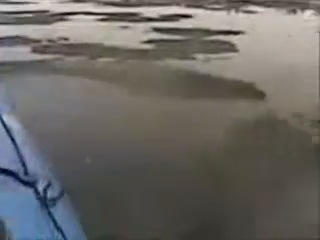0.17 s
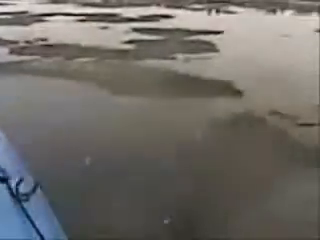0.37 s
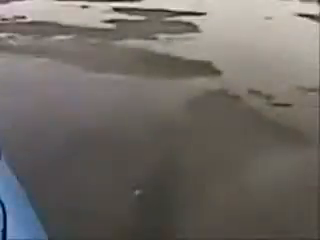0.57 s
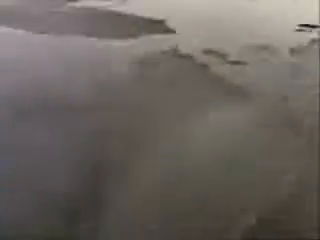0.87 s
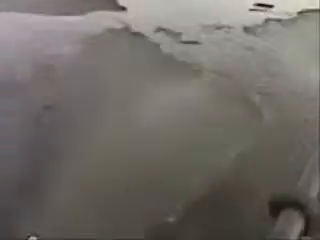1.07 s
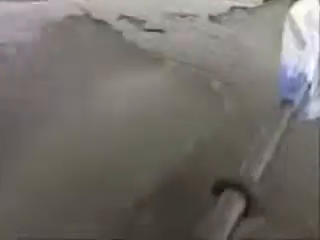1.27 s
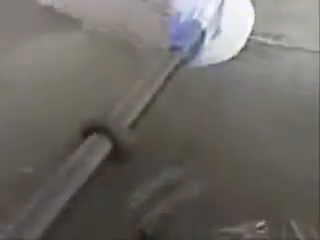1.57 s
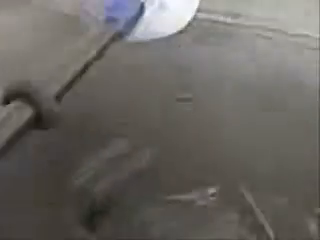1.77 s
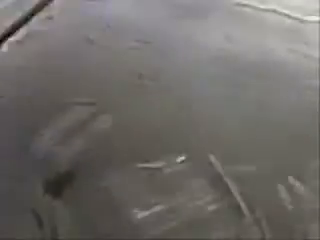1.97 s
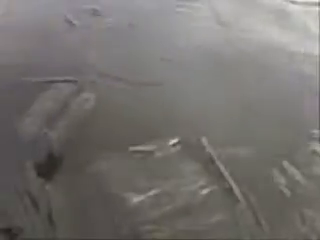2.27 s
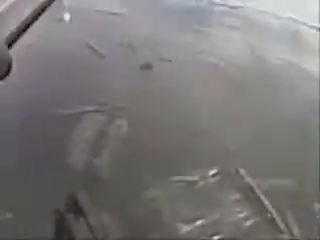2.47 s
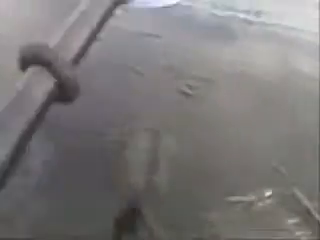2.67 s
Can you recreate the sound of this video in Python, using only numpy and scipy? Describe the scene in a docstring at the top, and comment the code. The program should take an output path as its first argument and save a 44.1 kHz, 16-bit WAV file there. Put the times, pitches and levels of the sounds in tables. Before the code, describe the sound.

Water stirred beside a gliding kayak washes and fizzes softly, then thins as paddle drips plop and trickle; a quick hollow knock mid-way, fainter ones later. Open calm lake, close dull microphone, steady hiss.

```python
"""On a calm, partly frozen lake, a kayak glides past its last stroke. A small dull microphone at the seat hears
a wash of noise and fine bubbles over a low slosh, with a steady faint hiss under it. Water off the raised
paddle trickles and lands as ticks, noise splashes and ringing bubbles; larger bubbles gurgle close beside the
hull, and a hollow note swells in the wash. The paddle knocks the hollow plastic hull: bursts of contact noise
over decaying modes."""
import sys
import numpy as np
from scipy import signal
from scipy.fft import rfft, irfft, next_fast_len
from scipy.io import wavfile
from scipy.ndimage import uniform_filter1d, map_coordinates

SR = 44100
rng = np.random.default_rng(int(sys.argv[2]) if len(sys.argv) > 2 else 0)


def bounce(signal):
    """Save signal as a 16-bit WAV file at the path given by the first command-line argument."""
    frames = np.transpose(np.atleast_2d(signal))
    limited = np.clip(frames, -1, 1)
    pcm = np.round(limited * 32767).astype(np.int16)
    wavfile.write(sys.argv[1], SR, pcm)


N = 124362  # samples, about 2.82 s


def amp(db):
    """Decibels to gain."""
    return 10 ** (np.asarray(db) / 20)


def unit(x):
    """Scale x to rms 1."""
    return x / np.sqrt(np.mean(x ** 2) + 1e-20)


def fade(t, t60):
    """Exponential decay, down 60 dB after t60 seconds."""
    return amp(-60 * t / t60)


def onset(t, attack_s):
    """Exponential rise from silence with time constant attack_s."""
    return 1 - np.exp(-t / attack_s)


def along(points, hz):
    """Interpolate (frequency [Hz], value) points on a log frequency axis."""
    f, v = np.transpose(points)
    return np.interp(np.log(hz + 1), np.log(f + 1), v)


def curve(rows):
    """Interpolate (time [s], value) points to one value per sample."""
    return np.interp(np.arange(N) / SR, *np.transpose(rows))


def wobble(rate):
    """A smooth random curve through rate knots a second."""
    knots = rng.standard_normal(1024)
    return map_coordinates(knots, [np.arange(N) * rate / SR], mode="wrap")


def coloured(x, colour):
    """Filter x by a function from Hz to dB."""
    m = next_fast_len(len(x) + 4096)
    gain = amp(colour(np.fft.rfftfreq(m, 1 / SR)))
    return irfft(rfft(x, m) * gain, m)[:len(x)]


def noise(points):
    """Noise of rms 1 with the given spectrum."""
    return unit(coloured(rng.standard_normal(N), lambda hz: along(points, hz)))


def add(out, s, x):
    """Mix x into out at time s, cut off at the end of out."""
    part = out[max(0, round(s * SR)):][:len(x)]
    part += x[:len(part)]


def event_time():
    """Time axis of one short event, 0.2 s long."""
    return np.arange(SR // 5) / SR


SPATTER_DB, SPATTER_PER_S = 3.5, 684  # uneven specks of spray: depth [dB], knots per second


def burst(colour, attack_s, t60):
    """A speckled puff of coloured noise that dies away, with the energy of its envelope."""
    t = event_time()
    envelope = fade(t, t60) * onset(t, attack_s)
    specks = rng.standard_normal(len(t)) * amp(SPATTER_DB * wobble(SPATTER_PER_S)[:len(t)])
    puff = unit(coloured(specks, colour)) * envelope
    return puff * np.linalg.norm(envelope) / np.linalg.norm(puff)


def bubble(t, hz, cycles, rise, attack_s):
    """A trapped air bubble rings and rises in pitch by the share rise as it fades by 60 dB."""
    life = cycles / hz
    turns = hz * (t + rise * t * t / (2 * life))
    return np.sin(2 * np.pi * turns) * fade(t, life) * onset(t, attack_s)


BUBBLE_RISE = 0.1  # share by which pitch rises over the life of a small bubble

# Steady hiss in the background, spectrum: (frequency [Hz], level [dB])
FLOOR_COLOUR = [(100, -12), (1200, 4), (3400, 3.5), (4500, -2)]
FLOOR_DB = -54


def floor():
    """Steady coloured hiss in the background."""
    return amp(FLOOR_DB) * noise(FLOOR_COLOUR)


# Stirred water at the seat, spectrum of rush, fizz and trickle: (frequency [Hz], level [dB])
WASH_COLOUR = [(150, -37), (400, -11), (700, -5), (1000, -6.5), (1300, -2), (1650, -1.5), (2100, 0),
               (2700, -1), (3300, -12), (4500, -21.5)]
GRAIN_ATTACK_S = 0.00042


def swarm(per_s, spread_db, cycles):
    """Tiny bubbles of random time, pitch and size overlap into a texture of rms 1."""
    count = int(per_s * N / SR)
    start, pitch, chance = rng.random((3, count, 1))
    t = np.arange(SR // 20) / SR
    low_hz, high_hz = 800, 3300
    hz = low_hz + (high_hz - low_hz) * pitch
    size = amp(-spread_db * np.log(0.051 + chance))  # a few are much larger
    grains = size * bubble(t, hz, cycles, BUBBLE_RISE, GRAIN_ATTACK_S) * np.sqrt(hz)
    where = (start * N).astype(int) + np.arange(len(t))
    mixed = np.bincount(where.ravel(), grains.ravel(), N)[:N]
    return unit(coloured(mixed, lambda f: along(WASH_COLOUR, f)))


PATCHY_DB = 3.5  # rms depth of the patches


def patchy(x):
    """The rush swells and thins in random patches about 500 Hz wide and 30 ms long, at rms 1."""
    z = signal.stft(x, nperseg=512)[2]
    field = uniform_filter1d(rng.standard_normal(z.shape), size=6, axis=0)  # over pitch
    field = uniform_filter1d(field, size=5, axis=1)  # over time
    return unit(signal.istft(z * amp(PATCHY_DB * unit(field)), nperseg=512)[1][:N])


# Wash of the last stroke, close to the seat: (time [s], level [dB])
WASH_LEVEL = [(0, -45.5), (.28, -42.5), (.39, -47), (.55, -46), (.75, -44.5), (1.1, -48), (1.6, -50.5),
              (2.03, -50.5), (2.5, -54), (2.82, -54)]
# Low slosh along the hull: (time [s], level [dB])
SLOSH_LEVEL = [(0, -51.5), (.3, -55), (.6, -56.5), (.85, -55.5), (1.05, -53), (1.3, -56), (1.65, -57),
               (1.88, -54.5), (2.1, -60), (2.45, -58), (2.62, -53.5), (2.82, -49.5)]
# Spectrum of that slosh: (frequency [Hz], level [dB])
SLOSH_COLOUR = [(25, -44), (45, -18), (80, -8), (165, -9.5), (230, -2.5), (330, 0), (800, -1), (1150, 2.5),
                (1800, -22), (4000, -32)]
FIZZ_PER_S, FIZZ_SPREAD_DB, FIZZ_CYCLES = 800, 1, 29
FIZZ_DB, RUSH_DB = -4, -5.5  # relative to the wash level


def wash():
    """Stirred water: fine bubbles on a soft rush, over a low uneven slosh."""
    fizz = amp(FIZZ_DB) * swarm(FIZZ_PER_S, FIZZ_SPREAD_DB, FIZZ_CYCLES)
    rush_level = RUSH_DB + 0.74 * wobble(70) + 1.13 * wobble(24)
    rush = amp(rush_level) * patchy(noise(WASH_COLOUR))
    slosh = amp(curve(SLOSH_LEVEL) + 2.5 * wobble(34.91)) * noise(SLOSH_COLOUR)
    return amp(curve(WASH_LEVEL)) * (fizz + rush) + slosh


# Small drops off the raised paddle: (time [s], level [dB])
TRICKLE_LEVEL = [(0, -65), (1.3, -57), (1.7, -53.5), (2.1, -55.5), (2.5, -56.5)]
TRICKLE_PER_S, TRICKLE_SPREAD_DB, TRICKLE_CYCLES = 170, 2.5, 17


def trickle():
    """Small separate drops each ring a tiny bubble, sparser and shorter than the fizz."""
    return amp(curve(TRICKLE_LEVEL)) * swarm(TRICKLE_PER_S, TRICKLE_SPREAD_DB, TRICKLE_CYCLES)


# Water landing on the lake near the seat: (time [s], bubble pitch [Hz], bubble level [dB],
# bubble life [cycles], splash level [dB], splash t60 [s])
PLOPS = [(.009, 2430, -30, 54, -36.5, 0.035), (0.233, 1040, -36.5, 25, -41, .06),
         (.329, 926, -33, 30, -29.5, 0.054), (.349, 2880, -32.5, 105, -42, 0.036),
         (0.353, 940, -34, 38, -41, 0.052), (0.603, 2570, -32.5, 65, -39.5, 0.12),
         (.831, 2720, -34.5, 89, -51, 0.033), (1.127, 1486, -34.5, 63, -41, 0.069),
         (1.202, 1403, -42, 72, -36.5, 0.12), (1.313, 2120, -31, 91, -35.5, 0.025),
         (1.321, 1900, -28, 36, -42, 0.15), (1.402, 1955, -23, 37, -36.5, 0.049),
         (1.457, 2113, -34, 77, -36, 0.038), (1.463, 2190, -24.5, 46, -37, 0.023),
         (1.686, 910, -34, 21, -43, 0.035), (1.688, 1680, -25, 45, -34, 0.018),
         (1.835, 2660, -36.5, 250, -32, 0.044), (1.865, 2170, -36, 41, -40, 0.041),
         (1.88, 1177, -28.5, 35, -37, 0.057), (1.893, 1215, -31, 26, -36.5, 0.028),
         (1.912, 2200, -36, 88, -50, 0.033), (1.931, 2620, -39.5, 64, -40, 0.027),
         (1.951, 1710, -30, 49, -42, 0.014), (1.978, 1141, -30.5, 29, -37, 0.057),
         (1.995, 2360, -38, 31, -36.5, 0.034), (2.067, 1844, -27.5, 48, -33.5, 0.023),
         (2.087, 1920, -39, 40, -38, 0.038), (2.115, 1734, -36, 72, -46.5, 0.035),
         (2.137, 2270, -34.5, 47, -39, 0.033), (2.201, 1085, -39, 60, -40.5, 0.044),
         (2.24, 2600, -37.5, 83, -42, 0.031), (2.257, 1322, -38.5, 87, -49, 0.069),
         (2.378, 1290, -39, 44, -41, 0.036), (2.555, 1170, -39, 62, -40.5, 0.11),
         (2.649, 1700, -34, 33, -40, 0.044), (2.662, 1260, -29.5, 56, -31.5, 0.053),
         (2.666, 2460, -33.5, 98, -42, 0.038), (2.685, 1060, -22, 17, -39, 0.049),
         (2.726, 1151, -31, 56, -39, 0.11), (2.762, 1210, -26, 11, -44.5, 0.11)]
# Splash spectrum before the focus on its bubble: (frequency [Hz], level [dB])
SPLASH_COLOUR = [(100, -17), (350, -14.5), (650, 0), (1000, 4), (1400, 3), (2000, 1.5), (2700, -3),
                 (3500, -7), (4600, -14)]
BUBBLE_ATTACK_S, SPLASH_ATTACK_S = 0.0019, 0.0016
SPLASH_FOCUS_DB, SPLASH_WIDTH_OCT = 5.5, 0.46  # extra strength near the bubble's pitch
TICK_DB, TICK_T60_S = 3.5, 0.0071  # first contact of the water, relative to its splash
CONTACT_ATTACK_S = 0.0005  # shared by ticks and hull clacks


def plops():
    """Each fall of water ticks on the surface, makes a short splash and traps a bubble."""
    out, t = np.zeros(N), event_time()
    for s, hz, bubble_db, cycles, splash_db, t60 in PLOPS:
        def colour(f):
            octaves = np.log2((f + 1) / hz)
            focus = np.exp(-.5 * (octaves / SPLASH_WIDTH_OCT) ** 2)
            return along(SPLASH_COLOUR, f) + SPLASH_FOCUS_DB * focus

        tick = amp(TICK_DB) * burst(colour, CONTACT_ATTACK_S, TICK_T60_S)
        splash = burst(colour, SPLASH_ATTACK_S, t60)
        add(out, s, amp(splash_db) * (tick + splash))
        add(out, s, amp(bubble_db) * bubble(t, hz, cycles, BUBBLE_RISE, BUBBLE_ATTACK_S))
    return out


# Big slow bubbles close beside the hull: (time [s], pitch [Hz], level [dB])
GURGLES = [(.442, 386, -44.5), (0.468, 342, -40.5), (.931, 395, -42), (0.956, 269, -48), (.974, 306, -39.5),
           (.98, 223, -45.5), (1.02, 640, -42), (1.074, 530, -41), (1.099, 323, -40.5), (1.331, 405, -40),
           (1.494, 320, -37.5), (1.512, 249, -46.5), (2.691, 630, -40.5), (2.698, 350, -42),
           (2.767, 341, -39.5)]
# Water shoved aside by a large bubble, spectrum: (frequency [Hz], level [dB])
PUSH_COLOUR = [(25, -19), (130, -8.5), (280, 3), (500, -5), (1200, -16), (4000, -27)]
GURGLE_CYCLES, GURGLE_RISE, GURGLE_ATTACK_S = 20, 0.02, 0.0023
PUSH_DB, PUSH_T60_S = -9, 0.099  # level relative to the ring


def gurgles():
    """Large bubbles ring low with a soft start, each on a dull push of water."""
    out, t = np.zeros(N), event_time()
    for s, hz, db in GURGLES:
        ring = bubble(t, hz, GURGLE_CYCLES, GURGLE_RISE, GURGLE_ATTACK_S)
        push = burst(lambda f: along(PUSH_COLOUR, f), GURGLE_ATTACK_S, PUSH_T60_S)
        add(out, s, amp(db) * (ring + amp(PUSH_DB) * push))
    return out


SING_S, SING_SPREAD_S = 0.92, 0.15  # centre and standard deviation of the swell
SING_HZ, SING_WIDTH_HZ, SING_DB = 1370, 75, -54  # pitch, offset where it is 6 dB down, peak level


def hollow_note():
    """A narrow band of noise, like a resonance in the wash, swells and fades."""
    def colour(hz):
        return -20 * np.log10(1 + ((hz - SING_HZ) / SING_WIDTH_HZ) ** 2)

    band = unit(coloured(rng.standard_normal(N), colour))
    swell = np.exp(-.5 * ((np.arange(N) / SR - SING_S) / SING_SPREAD_S) ** 2)
    return amp(SING_DB) * band * swell


# Paddle blows on the hull, within reach of the seat: (time [s], ring level [dB], clack level [dB])
KNOCKS = [(1.465, -46, -30), (1.475, -39, -29), (1.4835, -37, -30), (1.490, -40, -32), (1.5, -42, -40.5),
          (1.881, -44, -55), (2.2, -39.5, -34), (2.665, -47, -48)]
# Modes of the hollow plastic hull: (frequency [Hz], level [dB], t60 [s])
HULL = [(129, -10.5, 0.11), (246, -7.5, 0.096), (361, 8, 0.058), (432, -3.5, 0.051), (613, 3.5, 0.089),
        (913, -5, 0.093), (1170, 4, 0.083), (1370, -9, 0.041), (1700, 1, 0.035)]
# Contact noise of a blow, spectrum: (frequency [Hz], level [dB])
CLACK_COLOUR = [(60, -15), (250, -15), (600, -4.5), (1100, 8.5), (1600, -3), (2150, 3.5), (3000, -14),
                (4500, -24.5)]
CLACK_T60_S = 0.03
HULL_SCATTER, HULL_SCATTER_DB = 0.02, 1.1  # random spread of each mode's pitch (share) and level


def knocks():
    """Each blow clacks and briefly rings the hull's modes, scattered a little from blow to blow."""
    out, t = np.zeros(N), event_time()
    for s, ring_db, clack_db in KNOCKS:
        ring = np.zeros(len(t))
        for hz, db, t60 in HULL:
            level = amp(db + rng.normal(0, HULL_SCATTER_DB))
            turns = hz * rng.normal(1, HULL_SCATTER) * t + rng.random()  # random phase
            ring += level * fade(t, t60) * np.sin(2 * np.pi * turns)
        clack = burst(lambda f: along(CLACK_COLOUR, f), CONTACT_ATTACK_S, CLACK_T60_S)
        add(out, s, amp(ring_db) * ring * onset(t, 0.0025) / 2)
        add(out, s, amp(clack_db) * clack)
    return out


def scene():
    """Water and knocks sum without echo, over the steady hiss in the background."""
    water = wash() + trickle() + plops() + gurgles() + hollow_note()
    return (floor() + water + knocks())[None]


# Resonances of the microphone housing: (frequency [Hz], width [Hz], boost [dB])
HOUSING = [(1190, 100, 0.5), (2153, 17, 0.5), (2500, 20.6, 0.5), (3270, 39, 5), (3442, 24, 3.5),
           (4520, 200, 6)]


def housing(x):
    """The case around the microphone rings: each resonance boosts a band."""
    m = next_fast_len(len(x) + 4096)
    f = np.fft.rfftfreq(m, 1 / SR)
    response = 1
    for hz, width, db in HOUSING:
        band = 1j * f * width / (hz * hz - f * f + 1j * f * width)
        response = response + (amp(db) - 1) * band
    return irfft(rfft(x, m) * response, m)[:len(x)]


# Response of the dull little microphone: (frequency [Hz], gain [dB])
MICROPHONE = [(25, 1), (70, 1.5), (3000, 1.5), (3450, 1), (3800, -6.5), (4500, -13.5), (4900, -16.5),
              (5300, -67), (7000, -77)]
# Second, fainter hiss added after the microphone, spectrum: (frequency [Hz], level [dB])
HISS_COLOUR = [(100, -1), (10000, -0.5), (10700, -7), (12000, -7.5)]
HISS_DB, TOP_HZ = -78.5, 12100  # hiss level before the low-pass, low-pass edge


def record(dry):
    """The microphone colours the sound and loses the treble; a faint hiss joins before a steep low-pass."""
    heard = coloured(housing(dry[0]), lambda hz: along(MICROPHONE, hz))
    hiss = amp(HISS_DB) * noise(HISS_COLOUR)
    low_pass = signal.ellip(10, .05, 60, TOP_HZ, fs=SR, output="sos")
    return signal.sosfilt(low_pass, heard + hiss)[None]


dry = scene()
out = record(dry)
bounce(out)
```